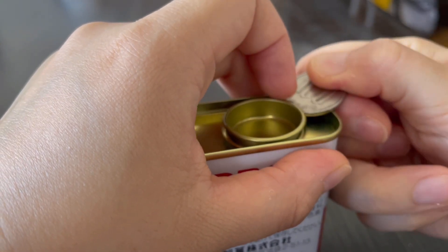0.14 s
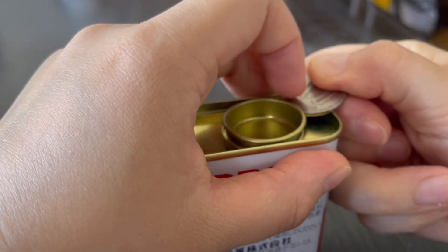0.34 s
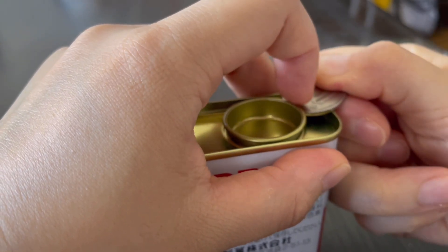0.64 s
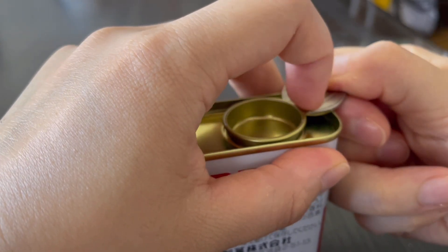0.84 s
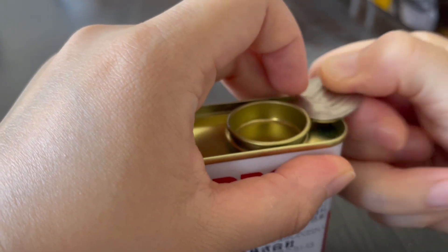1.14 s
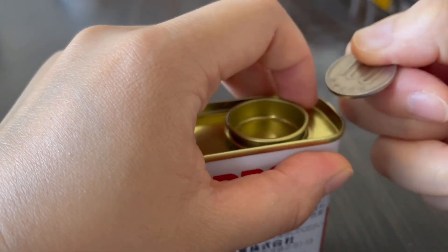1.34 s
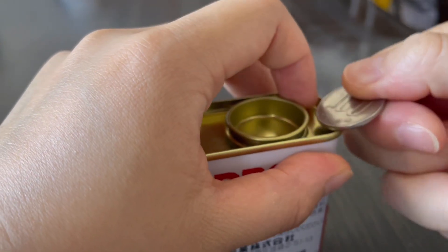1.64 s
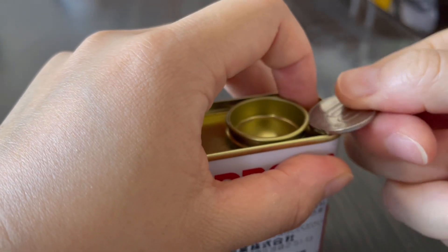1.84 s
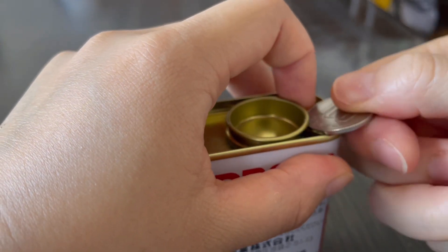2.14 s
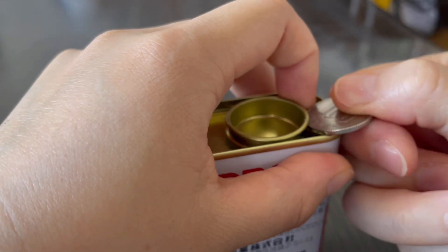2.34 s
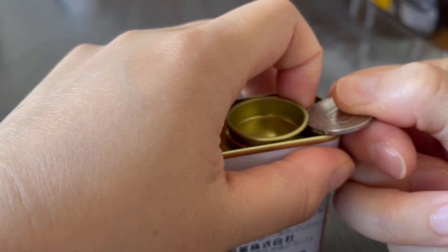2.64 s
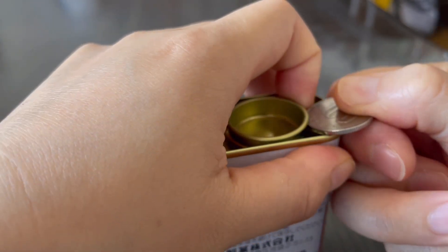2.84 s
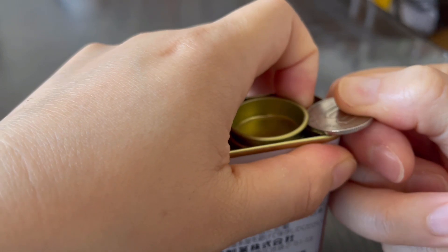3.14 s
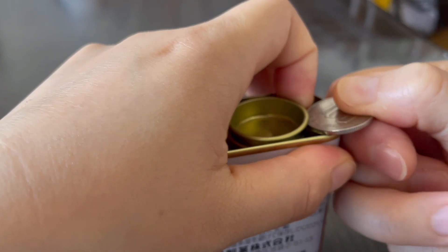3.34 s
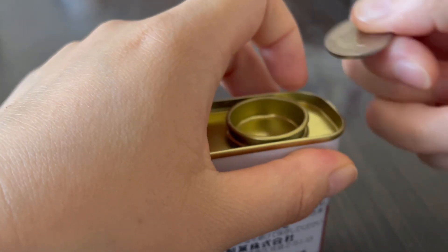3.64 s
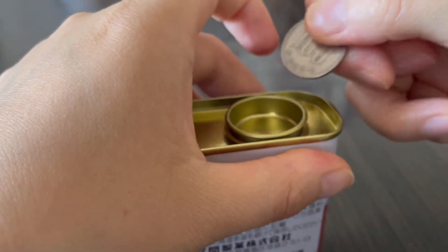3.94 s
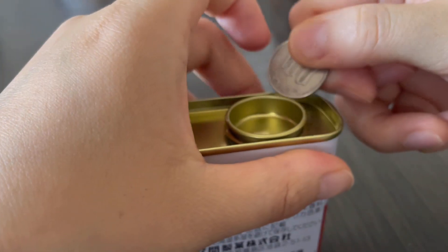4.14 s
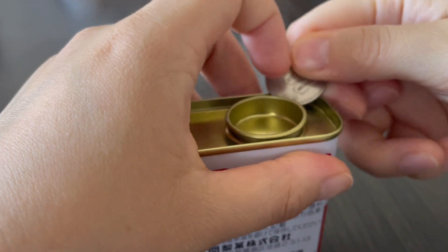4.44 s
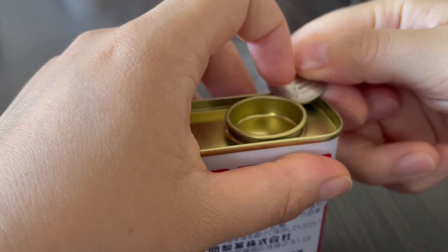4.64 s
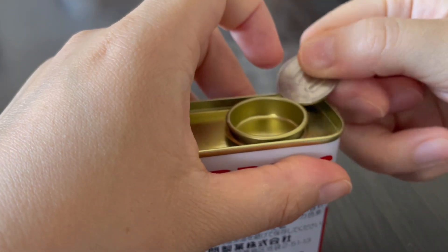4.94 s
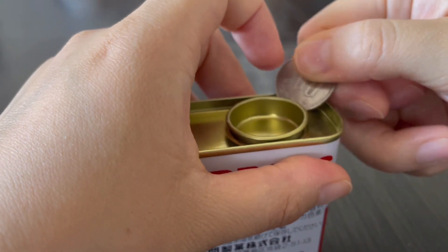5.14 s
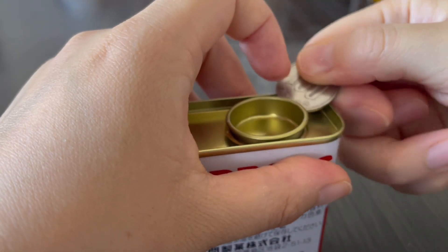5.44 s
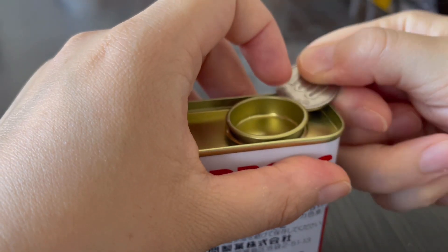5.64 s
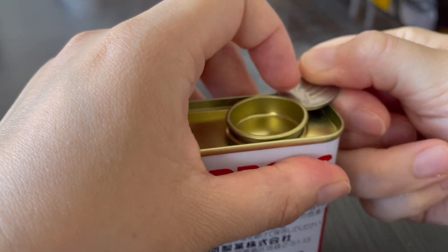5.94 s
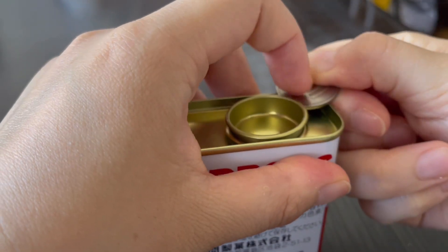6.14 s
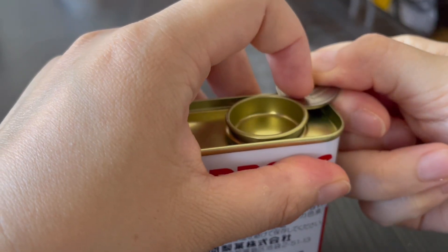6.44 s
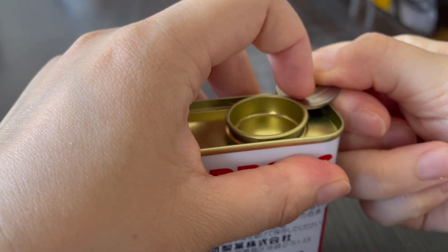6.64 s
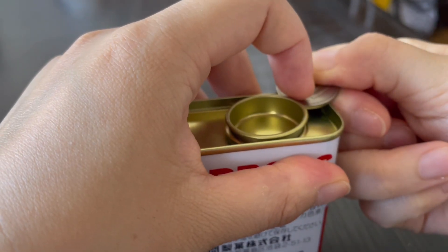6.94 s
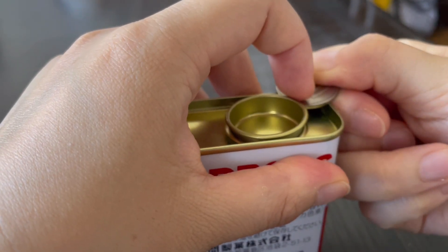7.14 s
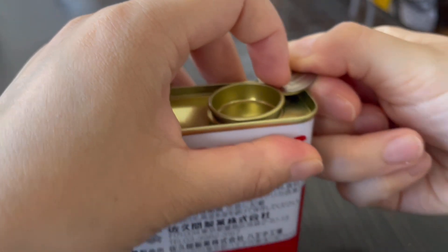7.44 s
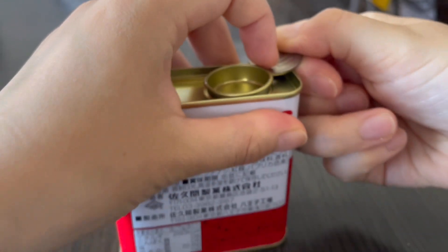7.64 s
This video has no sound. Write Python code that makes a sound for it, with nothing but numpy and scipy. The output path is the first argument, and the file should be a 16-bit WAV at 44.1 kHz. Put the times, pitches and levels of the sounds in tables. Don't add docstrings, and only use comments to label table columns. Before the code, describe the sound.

Close to a phone microphone in a quiet room, a coin works at the press-in lid of a small tin. Faint ticks and short gritty scrapes come in clusters, with bright clinks near two seconds. After a sparser stretch, harder taps lead to one sharp, loud slip just before five seconds, then a flat clink. Faint ticks follow, and the tin slides briefly on the table.

```python
import sys
import numpy as np
from scipy import signal
from scipy.fft import rfft, irfft, next_fast_len
from scipy.io import wavfile
from scipy.ndimage import uniform_filter1d

SR = 44100
rng = np.random.default_rng(int(sys.argv[2]) if len(sys.argv) > 2 else 0)


def decibels_to_gain(level_db):
    exponent = np.asarray(level_db, float) / 20
    return 10 ** exponent


def dump_mix(stems):
    frames = np.atleast_2d(stems).T
    limited = np.clip(frames, -1, 1)
    pcm = np.round(limited * 32767).astype(np.int16)
    wavfile.write(sys.argv[1], SR, pcm)


N = 343093

FAMILY_HZ = [3000, 6500, 11000]


def evened(x):
    return x / np.sqrt(np.mean(x ** 2) + 1e-20)


def read(points, hz):
    f, value = np.transpose(points)
    return np.interp(np.log(hz + 1), np.log(f + 1), value)


def add(mix, s, sound):
    part = mix[round(s * SR):][:len(sound)]
    part += sound[:len(part)]


def wander(count, width):
    noise = rng.standard_normal(count)
    return evened(uniform_filter1d(uniform_filter1d(noise, width), width))


def grit(count, spread_db):
    size_db = spread_db * np.minimum(rng.exponential(1, count), 4)
    return rng.standard_normal(count) * decibels_to_gain(size_db)


def resonate(x, hz, width):
    turn = np.exp(2j * np.pi * np.cumsum(hz * np.ones(len(x))) / SR)
    r = np.exp(-np.pi * width / SR)
    return 2 * (turn * signal.lfilter([1 - r], [1, -r], x / turn)).real


def families(kind, strength, ring, grip_db=0):
    mode_hz = [490, 690, 900, 1400, 1850, 2040, 2250, 2600, 3650, 4085, 4470, 4750, 5300, 5800, 6600, 7250,
               7600, 8140, 8300, 8600, 8920, 9450, 9950, 10450, 11350, 11900, 12750, 13300, 13630, 14600]
    # t60/s, then level/dB when struck at lid rim, by coin edge, in a slip,
    # on coin face, on top plate
    box_modes = [(0.073, -13.5, -16, -14.5, -21, -18.5), (0.13, -15.5, -15, -17, -19, -13),
                 (0.07, -8, -10.5, -15.5, -17, -7), (0.021, -2.5, 1.5, -7.5, 0, 2.5),
                 (0.095, -1.5, -6, -13, -5, -4.5), (0.066, -4.5, -5, -7, -9.5, -0.5),
                 (0.01237, -6, -9, -13.5, -12.5, -2.5), (0.02, -18, -2.5, -23, -7.5, -9)]
    lid_modes = [(0.015, 3, -12, -17.5, -3.5, -19), (0.033, 1.5, -10, -13.5, -1, -20),
                 (0.057, -10, -4.5, -17, -22, -25.5), (0.035, -9, -3.5, -14, -11, -24),
                 (0.017, -12, -11, -16.5, -6, -31.5), (0.029, -1.5, -4, -12.5, 0.5, -19)]
    coin_modes = [(0.0173, -46, -25, -17.5, -10, -24.5), (0.029, -9, -35, -9.5, -12.5, -23),
                  (0.011, -9, -5, -9.5, -24, -30.5), (0.045, -3, 1, -21.5, 1, -23),
                  (0.045, 1, 1, -13.5, -1, -30), (0.029, 2.5, -2.5, -21, -18, -28),
                  (0.017, -3, -0.5, -4, 7, -27), (0.035, -6.5, -6, 1, 5, -22),
                  (0.0184, -12, -45, -4, -22, -29), (0.015, -6.5, -14, 0.5, -21, -22)]
    coin_top_modes = [(0.0099, -23, -32, -6, -23, -30.5), (0.015, -24, -20, -23.5, -11, -39),
                      (0.02, -33, -29, -12, -8, -26), (0.03, -15.5, -24, -11.5, -16, -32),
                      (0.045, -28, -6, -3, -10, -31.5), (0.012, -26, -9, -18.5, -21, -41)]
    linger_db = [-5.5, -4, -16.5, -17, -3]
    crack_db = [-4, -2, 0, -2.5, -8]
    quick_t60 = 0.011
    weak_ring, scatter_db = 0.55, 3.5
    twin_split, twin_db = 0.01, -3.5

    t = np.arange(3000) / SR
    table = np.array(box_modes + lid_modes + coin_modes + coin_top_modes)
    hz = np.array(mode_hz)[:, None]
    t60 = table[:, :1] * ring * (weak_ring + (1 - weak_ring) * strength)
    db = table[:, 1 + kind:2 + kind] + scatter_db * (1 - strength) * rng.standard_normal(hz.shape)
    sign = (-1) ** np.arange(len(hz))[:, None]

    linger = decibels_to_gain(linger_db[kind] + grip_db - 60 * t / t60)
    twin = decibels_to_gain(twin_db) * linger * np.sin(2 * np.pi * hz * (1 - sign * twin_split) * t)
    main = (decibels_to_gain(-60 * t / quick_t60) + linger) * np.sin(2 * np.pi * hz * t)
    modes = sign * decibels_to_gain(db) * (main + twin)

    family = np.digitize(hz[:, 0], FAMILY_HZ)
    edges = [500, *FAMILY_HZ, 14900]
    out = []
    for k in range(4):
        rung = modes[family == k].sum(0)
        crack = signal.lfilter(*signal.butter(2, edges[k:k + 2], "band", fs=SR), t == 0)
        out.append([rung / abs(rung).max(), decibels_to_gain(crack_db[kind]) * crack / abs(crack).max()])
    return np.swapaxes(out, 0, 1)


def taps():
    # t/s, tin peak level/dB, coin peak level/dB, contact time/ms
    rim_taps = [(0.855, -56, -64, 1.5), (0.938, -61, -67.5, 0.62), (1.03, -51, -64.5, 1.3),
                (1.334, -61, -65.5, 0.5), (1.356, -52.5, -62, 1.2), (1.393, -57, -73, 0.45),
                (1.677, -54, -59.5, 0.67), (1.783, -27, -27.5, 1.7), (1.788, -35, -28, 1.6),
                (1.986, -41.5, -47.5, 0.37), (2.0917, -32, -28.5, .6), (2.495, -63, -67, 1),
                (2.783, -60, -71, 1.1), (3.399, -55, -62, 0.8)]
    edge_taps = [(1.183, -72, -63, .5), (1.239, -72, -66, 0.5), (1.595, -50, -51, 1.1),
                 (3.346, -67, -72, 1.9), (3.384, -55.5, -60, 3.4), (3.426, -68, -59, 0.5),
                 (3.435, -71, -64, 0.5), (4.229, -51, -37.5, 1.8), (4.438, -37, -22.5, 0.99),
                 (6.511, -57, -69, 0.79), (6.54, -81.5, -64.5, 0.42), (6.609, -82.5, -56.5, 0.42),
                 (7.215, -63.5, -63, 1), (7.276, -69, -71, 1.04)]
    slips = [
        (4.8152, -46, -58, 0.89),
        (4.8168, -31, -58, 0.95),
        (4.8193, -17.5, -8, 0.87),
        (5.965, -53.5, -47.5, 0.58),
        (7.07, -56, -64.5, 0.93),
    ]
    face_taps = [
        (5.3074, -31.5, -25, 1.6),
    ]
    plate_taps = [(1.14, -46, -51, 3), (1.159, -51, -54, 0.9), (3.619, -57.5, -63, 6.1),
                  (3.645, -63, -63, 1), (3.888, -58, -73, 1.2), (4.2085, -35, -48, 5.5),
                  (4.752, -34.5, -47, 0.67), (4.925, -45.5, -69, 0.77), (4.948, -49, -65.5, 1.1),
                  (5.007, -46, -63, 3.6), (5.022, -34, -43.5, 2), (6.143, -56, -62.5, 1.2),
                  (6.926, -54, -72, 0.54)]
    # t/s, lingering ring level/dB, lid level/dB, top level/dB
    grip = [(1.595, -2, 4.5, -6), (1.783, -9, -3.5, -1), (1.788, -2, -5, -6), (1.986, 1, -0.5, -9),
            (2.0917, -9, 0.5, -2), (3.4, 0, 0, 3), (4.2085, -11, 4, -4), (4.229, -6, -0.5, 5),
            (4.438, -12, -5, -3), (4.752, -13, -2, 4), (4.8193, -9, 0, -1), (5.022, 1, -6, 3),
            (5.3072, -10, -1.5, 3.5), (5.965, -7, -1.5, -10), (6.3, -7, -3, 3)]
    ring_factor = [0.57, 0.99, 0.58, 0.45, 0.55]
    lid_answer_db = [6.5, 2, -9.5, -2.5, 1]
    coin_top_db = [-3, -10.5, -6.5, -10, -15]
    lid_follows_box = 0.15
    chatter_db = -6
    light_top_db, light_crack_db = 12, 6

    out, dry, ms = np.zeros(N), np.zeros(N), np.arange(800) * 1000 / SR
    grip_s, *grip_columns = np.transpose(grip)
    for kind, table in enumerate([rim_taps, edge_taps, slips, face_taps, plate_taps]):
        for s, box_db, coin_db, contact_ms in table:
            strength = np.clip((max(box_db, coin_db) + 55) / 20, 0, 1)
            grip_db, lid_grip_db, top_grip_db = (np.interp(s, grip_s, c) for c in grip_columns)
            lid_db = coin_db + lid_follows_box * (box_db - coin_db) + lid_answer_db[kind] + lid_grip_db
            top_db = coin_db + coin_top_db[kind] + light_top_db * (1 - strength) + top_grip_db

            chatter = grit(len(ms), 3.4) * np.exp(-ms / max(contact_ms, 0.05))
            chatter *= decibels_to_gain(chatter_db) * contact_ms / np.linalg.norm(chatter)
            blow = (ms == 0) + chatter
            answer = families(kind, strength, ring_factor[kind], grip_db)
            rung, crack = signal.fftconvolve(answer, [[blow]], axes=2)
            crack = crack * decibels_to_gain(light_crack_db * (1 - strength))
            gain = decibels_to_gain(np.array([box_db, lid_db, coin_db, top_db])) / abs(rung + crack).max(1)
            add(out, s, gain @ (rung + crack))
            add(dry, s, gain @ crack)
    return out, dry


def scrapes():
    # t/s, length/ms, rms level/dB, pinched box f/Hz
    rasps = [
        (1.153, 11.6, -55, 2100),
        (1.165, 12, -57.5, 2120),
        (1.34, 54, -79, 900),
        (1.598, 21, -63, 1500),
        (3.4665, 12, -60.5, 1710),
        (3.498, 14, -58.5, 1860),
        (4.649, 9.2, -65, 1380),
        (4.657, 44, -67, 1000),
    ]
    # t/s, length/ms, rms level/dB, pinched box start f/Hz, end f/Hz
    rubs = [(1.661, 13, -62, 1100, 1600), (1.678, 21, -58, 880, 1450), (1.679, 22, -64, 2300, 2000),
            (1.703, 16, -71, 1400, 1900), (1.942, 20, -65, 1300, 1300), (2.07, 13, -65, 900, 900),
            (3.482, 14, -57, 1940, 1940), (3.76, 28, -72.5, 1400, 1400), (4.701, 64, -69.5, 2000, 2000),
            (4.912, 20.7, -59.5, 1300, 1750), (4.932, 39, -60, 1750, 2050), (4.975, 23, -62.5, 1990, 2050),
            (6.525, 28, -73, 1500, 1500)]
    # t/s, length/ms, rms level/dB, pinched lid start f/Hz, end f/Hz
    sings = [
        (1.075, 85, -74.5, 4450, 4600),
        (1.856, 15, -74, 3800, 3900),
        (1.926, 43, -75, 3950, 3500),
    ]
    sing_db = [3.5, -5, -8]
    rasp_db, rub_db = [-3.5, -9, -1], [-12.5, -19, -7]
    crack_gain = decibels_to_gain(3.5)
    pinch_width = 0.25

    out = np.zeros(N)
    for table, (lid_db, coin_db, leak_db) in [(rasps, rasp_db), (rubs, rub_db), (sings, sing_db)]:
        for s, length_ms, box_db, *pinch_hz in table:
            count = round(length_ms * SR / 1000)
            stroke = grit(count=4000, spread_db=6)[:count] * signal.windows.tukey(count, 0.15)
            modes, crack = families(kind=4, strength=0, ring=0.39)
            rung = signal.fftconvolve(modes + crack_gain * crack, stroke[None], axes=1)

            held = np.digitize(pinch_hz[0], FAMILY_HZ)
            glide_hz = np.interp(np.arange(rung.shape[1]), [0, count], [pinch_hz[0], pinch_hz[-1]])
            pinched = resonate(rung[held], glide_hz, pinch_width * pinch_hz[-1])
            rung[held] = pinched + decibels_to_gain(leak_db) * rung[held]
            rms_db = box_db + np.array([0, lid_db, coin_db, coin_db - 2.5])
            add(out, s, decibels_to_gain(rms_db) / rung[:, :count].std(1) @ rung)
    return out


def soft_rings(events, t60):
    out, t = np.zeros(N), np.arange(8000) / SR
    for s, db, hz in events:
        add(out, s, decibels_to_gain(db - 60 * t / t60) * np.sin(2 * np.pi * hz * t) * (1 - np.exp(-t / 0.000453)))
    return out


def knocks():
    # t/s, peak level/dB, f/Hz
    panels = [(.795, -56, 261), (0.86, -58, 230), (1.14, -56, 230), (1.358, -51, 276), (2.092, -45, 255),
              (4.439, -54, 123), (4.649, -51.5, 141), (4.681, -50.5, 310), (4.819, -49.5, 300),
              (4.8205, -41, 690), (3.644, -50.5, 880), (4.4385, -56, 4580), (2.093, -45, 59.6),
              (5.307, -49, 229), (6.14, -55, 254), (6.51, -57, 137.5), (7.072, -48.5, 242)]
    # t/s, peak level/dB, f/Hz
    damped_modes = [(2.091, -56.5, 440), (3.469, -55, 940), (3.508, -54, 902), (4.2295, -53, 13640),
                    (4.4395, -48, 8250), (4.438, -54, 263), (4.8, -58.5, 800), (4.819, -46, 488),
                    (4.819, -53.5, 222), (4.9, -54, 95), (6.926, -58, 667), (4.66, -56, 490), (3.8, -62, 500),
                    (7.071, -57, 110), (7.071, -54.5, 650)]
    # t/s, peak level/dB, f/Hz
    pings = [(0.857, -50.5, 700), (3.399, -51, 1420), (1.1395, -37.5, 1600), (2.0922, -22.5, 4080),
             (3.347, -56, 11500), (4.209, -31.5, 2110), (1.143, -45, 4230), (1.154, -49, 4200),
             (1.166, -46.5, 3280), (1.169, -54, 9200), (1.16, -51, 6440), (4.7525, -28, 1830),
             (5.0225, -42, 5830), (5.964, -50, 9500), (7.071, -50, 1386), (7.071, -62, 9700),
             (7.276, -60.5, 11300)]
    # t/s, peak level/dB, f/Hz
    free_modes = [(1.115, -58, 710), (1.789, -51, 1850), (3.508, -47, 1870), (3.512, -63, 4060),
                  (3.625, -68, 1900), (1.16, -64, 2540), (5.0225, -61, 8140), (5.2, -70, 2200),
                  (5.3075, -61, 4050), (1.789, -52, 7800), (1.789, -52, 8170), (3.468, -60, 4120),
                  (4.4385, -48, 8020), (4.754, -57, 1400), (4.82, -50, 13300), (5.3075, -54, 8150),
                  (5.3075, -53, 9450), (2.093, -58, 3800), (4.823, -43, 697), (4.82, -49, 13900),
                  (4.82, -52, 12250), (1.789, -60, 11700), (1.789, -56, 3600), (1.789, -58, 1400),
                  (1.789, -60, 700)]
    held = soft_rings(panels, t60=0.054) + soft_rings(damped_modes, t60=0.059)
    return held + soft_rings(pings, t60=0.021) + soft_rings(free_modes, t60=0.105)


def coin_catches():
    # t/s, peak level/dB, f/Hz
    chips = [(1.141, -51, 10500), (1.1425, -47, 5870), (1.986, -47, 8350), (2.0918, -32, 4650),
             (7.2755, -60, 10800), (1.141, -51, 13200), (1.783, -32.5, 3600), (1.788, -30, 3610),
             (1.783, -44, 3200), (1.783, -40, 5100), (4.65, -54, 1400), (7.071, -56, 4000),
             (1.783, -21.5, 8080), (1.783, -42, 13100), (2.0918, -24.5, 3810), (2.0918, -35, 4980),
             (2.0918, -43, 8800), (2.0918, -42, 13400), (2.0918, -40, 14500), (3.4692, -45.5, 3600),
             (3.62, -53, 1300), (4.2087, -41, 5920), (4.2087, -46, 4420), (4.2095, -27, 2030),
             (4.229, -47, 11500), (4.229, -42, 8600), (5.3074, -42, 11500), (5.3074, -44, 3000),
             (4.4382, -40, 1100), (4.229, -46, 12300), (4.229, -50, 14500), (4.4382, -34.5, 1416),
             (4.4382, -38, 4560), (4.4385, -41, 2600), (4.4385, -34, 9300), (4.753, -50, 10000),
             (4.8195, -24, 13850), (4.8195, -29, 12680), (5.022, -50, 10240), (5.3073, -30, 7960),
             (5.3073, -40, 6680), (5.3073, -37, 4750)]
    # t/s, peak level/dB, f/Hz
    catches = [(1.1415, -48, 1660), (1.1535, -52, 2150), (1.1575, -43, 2030), (1.1602, -40, 2070),
               (1.167, -51, 2100), (1.17, -47, 2060), (1.174, -56, 1900), (1.5965, -46, 2020),
               (1.601, -51, 1900), (1.596, -55, 900), (1.609, -52, 2050), (1.612, -57, 1350),
               (1.614, -52, 1950), (1.62, -55, 2250), (1.621, -57, 950), (1.664, -57, 1300),
               (1.667, -54, 2000), (1.668, -55, 950), (1.6775, -47, 920), (1.678, -53, 2250),
               (1.684, -50, 900), (1.685, -56, 2240), (1.6875, -45, 1320), (1.695, -48, 2050),
               (1.696, -53, 1440), (1.709, -56, 1880), (4.917, -55, 1470), (4.9245, -51, 1670),
               (4.934, -51, 1920), (4.941, -48, 2100), (4.948, -48, 1880), (4.953, -50, 2150),
               (4.962, -55, 2000), (4.977, -49, 2040), (4.983, -48, 2050), (4.992, -58, 2100),
               (3.399, -52.5, 4400), (3.504, -44.5, 900), (3.4762, -48, 1990), (3.508, -49, 1880),
               (3.484, -54, 1900), (3.491, -51, 1950), (3.5, -45, 1880), (1.986, -41, 1800),
               (4.4382, -35, 4580), (4.8195, -33, 2110), (1.786, -30.5, 4080), (1.7885, -36, 3650),
               (1.785, -38, 1414), (4.209, -52, 4600), (4.209, -48, 5950), (4.209, -52, 7350)]
    # t/s, peak level/dB, f/Hz
    crackle = [(1.1415, -52, 14200), (1.1475, -54, 13000), (1.1445, -50, 4300), (1.156, -55, 12500),
               (1.158, -54, 11500), (1.1605, -49, 13500), (1.16, -51, 9000), (1.1625, -53, 9000),
               (1.1655, -52, 13000), (1.165, -54, 6000), (1.17, -53, 13500), (1.1715, -53, 5800),
               (1.173, -53, 10000), (1.173, -54, 13000), (1.175, -54, 3800), (3.4675, -52, 4300),
               (3.471, -46, 4300), (3.4735, -44, 3500), (3.473, -45, 1700), (3.4795, -50, 4200),
               (3.482, -50, 4200), (3.49, -47, 4200), (3.4975, -52, 4200), (3.505, -52, 4400),
               (3.509, -54, 5000), (3.474, -56, 7400), (4.819, -34, 600), (1.783, -39, 3020),
               (1.783, -38, 6800), (1.788, -36, 5500), (5.3074, -34, 6700), (1.146, -45, 1350),
               (1.15, -52, 4600), (4.82, -42, 1020), (4.8195, -30, 2230), (1.784, -46, 680)]
    return soft_rings(chips, t60=0.013) + soft_rings(catches, t60=0.027) + soft_rings(crackle, t60=0.007)


def slide():
    # t/s, level/dB
    pressure = [
        (7.19, -93),
        (7.258, -70),
        (7.41, -67),
        (7.44, -61.5),
        (7.6, -64),
        (7.665, -65.5),
        (7.71, -84),
        (7.75, -86),
    ]
    # f/Hz, width/Hz, level/dB, strongest at t/s
    body_peaks = [(276, 49, -5.5, 7.5), (495, 30, -4, 7.5), (690, 42, -4.5, 7.5), (1000, 68, -5.5, 7.5),
                  (1300, 205, -6.5, 7.55), (1600, 90, -5, 7.48), (1880, 190, -10, 7.43)]
    # f/Hz, width/Hz, level/dB, strongest at t/s
    shell_peaks = [(2300, 500, -10, 7.5), (3780, 320, 4, 7.58), (4950, 610, -2.5, 7.55),
                   (5750, 230, 1, 7.38), (6250, 330, -5.5, 7.5), (7520, 380, 0.5, 7.44),
                   (9200, 540, -4.5, 7.5), (10600, 1300, -13, 7.45), (11800, 270, -3.5, 7.46),
                   (13100, 900, -8, 7.55)]
    trim_db, ridge_db, span_s = 3, 1.6, 0.25
    parts = [(body_peaks, 0, 0.5, 0), (shell_peaks, -9.5, 3.5, 0.07)]

    s, pressure_db = np.transpose(pressure)
    t = np.arange(s[0], s[-1], 1 / SR)
    since = t - s[0]
    rub, out = grit(len(t), spread_db=1), np.zeros(N)
    level_db = np.interp(t, s, pressure_db) + 1 * wander(len(t), width=300)
    for peaks, sag_db, fade_db, sink in parts:
        ridges = []
        for hz, width, db, best in peaks:
            ridge_level_db = db + ridge_db * wander(len(t), width=1500) - fade_db * abs(t - best) / span_s
            ridges.append(decibels_to_gain(ridge_level_db) * resonate(rub, hz * (1 - sink * since), width))
        mixed = sum(ridges[::2]) - sum(ridges[1::2])
        add(out, s[0], evened(mixed) * decibels_to_gain(level_db + trim_db + sag_db * since))
    return out


def room(x):
    # f/Hz, t60/s, level/dB
    room_bands = [(300, 0.17, 8), (814, 0.16, 4), (1800, 0.2, -3.5), (2945, 0.16, -1.5), (7900, 0.19, -8.5),
                  (12500, 0.14, -3.5), (15000, 0.12, -11)]
    # delay/s, level/dB
    echoes = [
        (.0025, -19),
        (.0062, -23),
        (.0115, -28),
        (.0165, -28),
        (.025, -31),
    ]
    room_db, start_s, smear_s = -16.5, 0.0016, 0.00054

    sparse = np.zeros(SR // 2)
    at = np.arange(0, len(sparse) - 20, 20)
    sparse[at + rng.integers(0, 20, len(at))] = rng.choice([-1., 1.], len(at))
    hz, t, z = signal.stft(sparse, SR, nperseg=256)
    t60, db = (read(np.array(room_bands)[:, [0, k]], hz)[:, None] for k in (1, 2))
    tail = signal.istft(z * decibels_to_gain(db - 60 * t / t60), SR, nperseg=256)[1]
    tail *= 1 - np.exp(-np.arange(len(tail)) / (SR * start_s))
    tail *= decibels_to_gain(room_db) / np.linalg.norm(tail)
    for s, echo_db in echoes:
        scattered = rng.standard_normal(400) * np.exp(-np.arange(400) / (SR * smear_s))
        add(tail, s, decibels_to_gain(echo_db) * scattered / np.linalg.norm(scattered))
    return signal.oaconvolve(x, tail)[:N]


def hiss():
    # f/Hz, level per Hz/dB
    hiss_spectrum = [(0.59, -30.5), (1.0, 8), (16, -4), (33, -6.5), (53, -7), (152, -16), (178, -14.5),
                     (370, -20), (533, -21), (626, -23), (707, -23), (1950, -28), (5580, -32),
                     (11100, -32.5), (16000, -34.5)]
    count = next_fast_len(N)
    hz = np.fft.rfftfreq(count, 1 / SR)
    z = rfft(rng.standard_normal(count)) * decibels_to_gain(read(hiss_spectrum, hz))
    z /= irfft(z * (hz > 20), count).std()
    low = 1 / (1 + (hz / 300) ** 2)
    rumble = irfft(z * low, count) * decibels_to_gain(0.9 * wander(count, width=3000))
    return decibels_to_gain(-65) * (irfft(z * (1 - low), count) + rumble)[:N]


def scene():
    struck, crack = taps()
    tin = struck + scrapes() + knocks() + coin_catches()
    sideways = decibels_to_gain(5.5) * crack
    return (tin + room(tin + sideways) + slide() + hiss())[None]


def low_pass(x):
    return signal.sosfilt(signal.butter(12, 16530, fs=SR, output="sos"), x)


def record(dry):
    edge_hz = [0, 15690, 15800, 16500, SR / 2]
    edge_db = [0, 0, -30, -42, -60]
    edge = signal.firwin2(1601, edge_hz, decibels_to_gain(np.array(edge_db)), fs=SR)
    last = signal.firwin(401, 16350, fs=SR)
    below = signal.oaconvolve(dry, edge[None], "same")
    loud = np.clip(uniform_filter1d(dry ** 2, size=256) / decibels_to_gain(2 * -41) - 1, 0, 1)
    past_edge = signal.oaconvolve(loud * (dry - below), last[None], "same")
    mix = below + decibels_to_gain(-14) * past_edge
    return low_pass(mix)


dry = scene()
out = record(dry)
dump_mix(out)
```